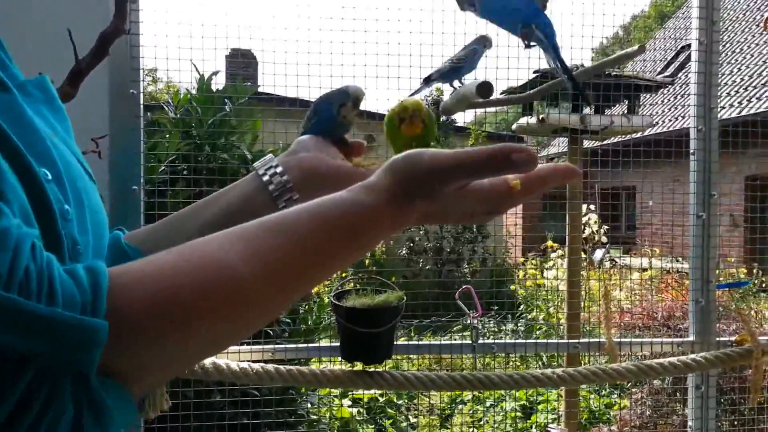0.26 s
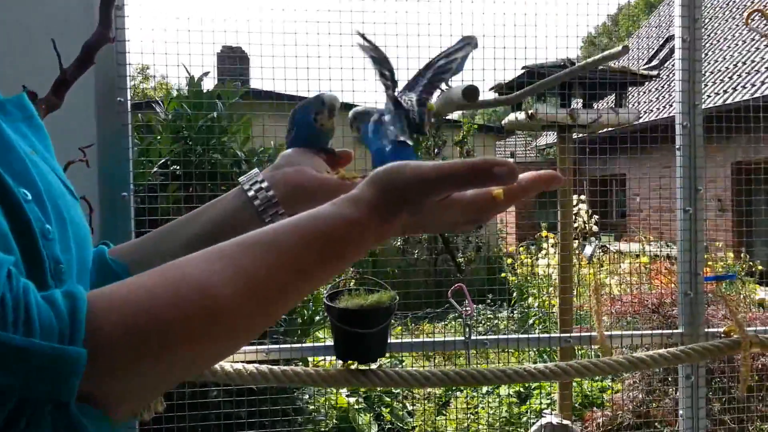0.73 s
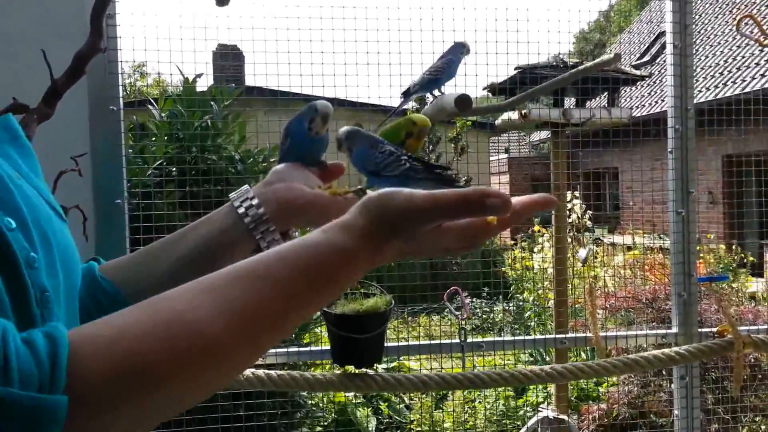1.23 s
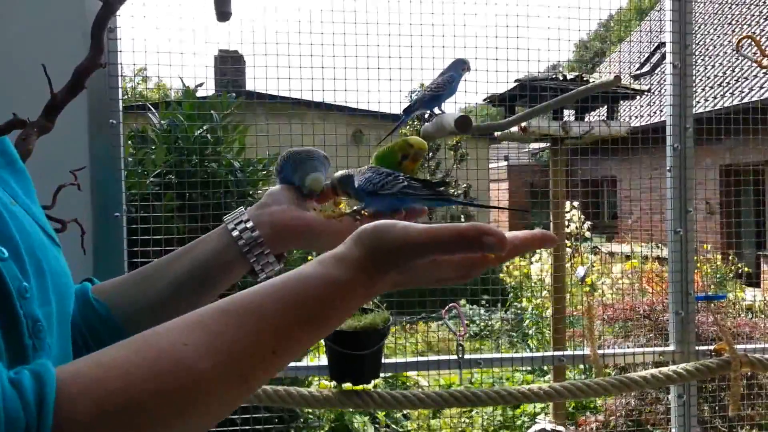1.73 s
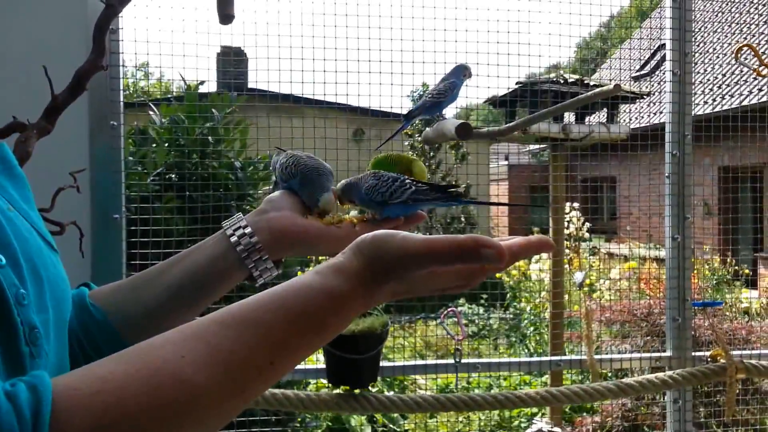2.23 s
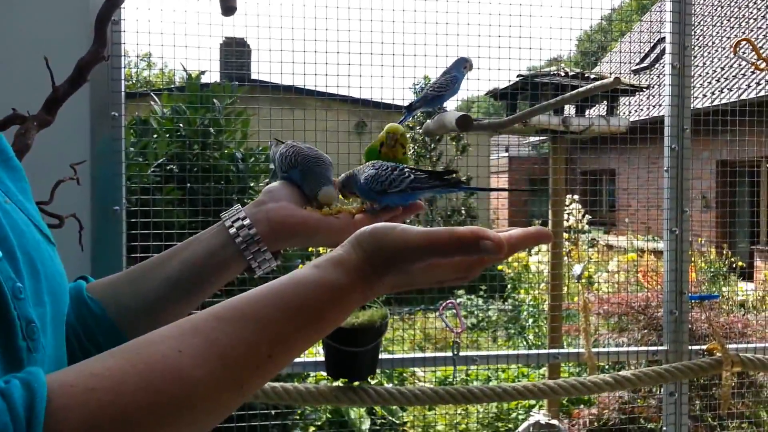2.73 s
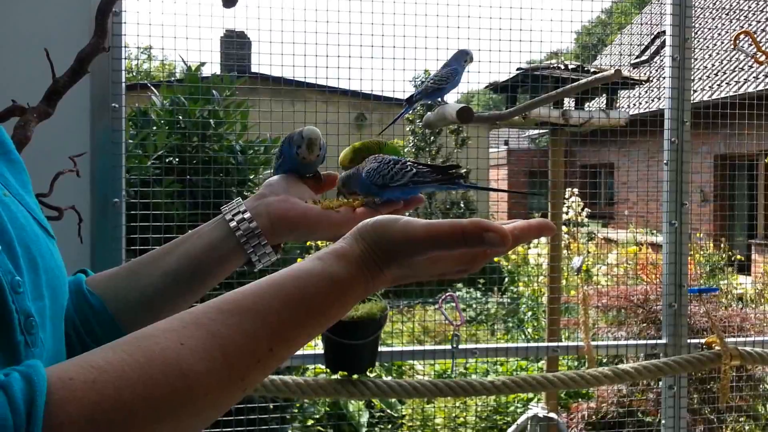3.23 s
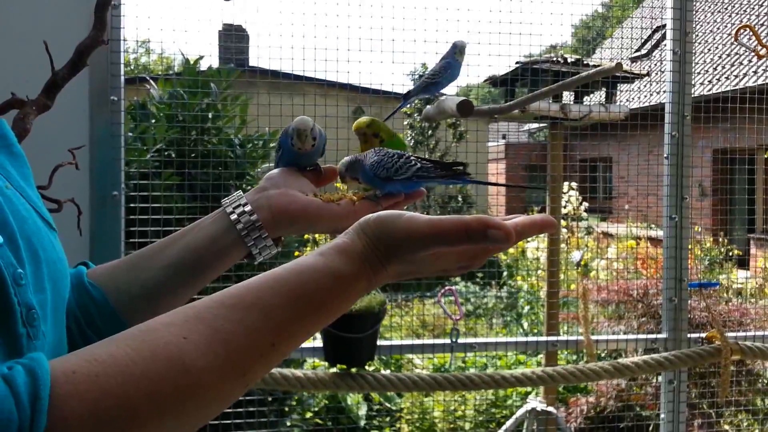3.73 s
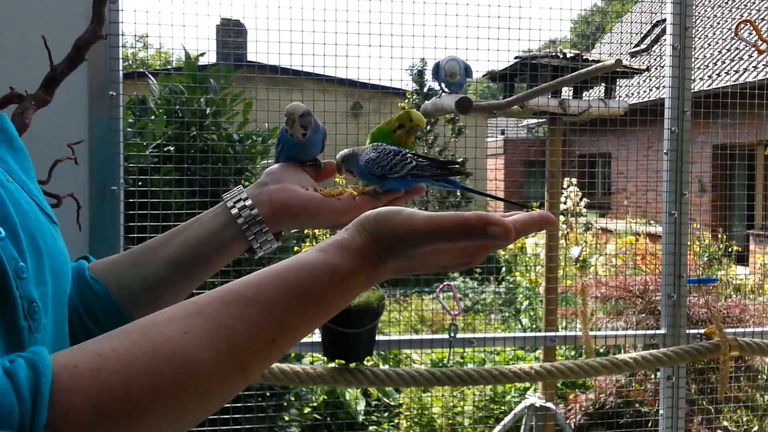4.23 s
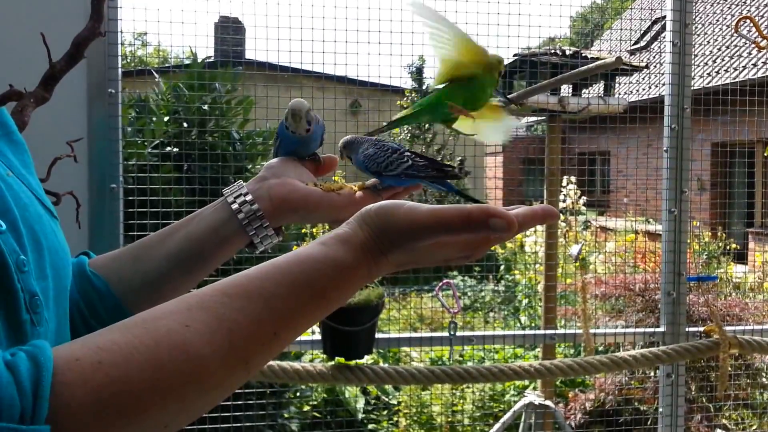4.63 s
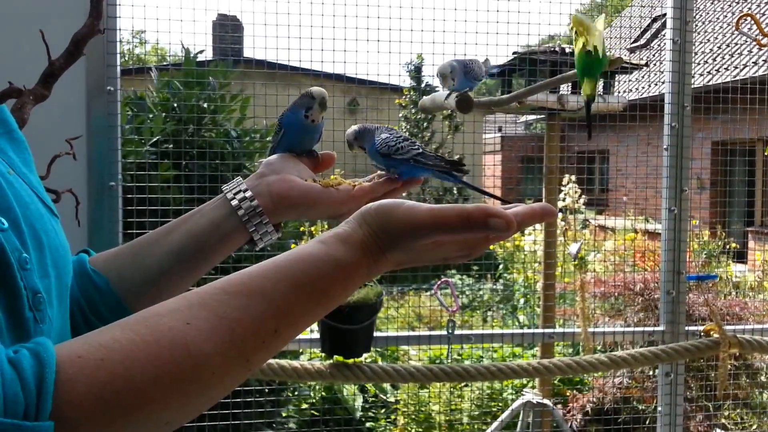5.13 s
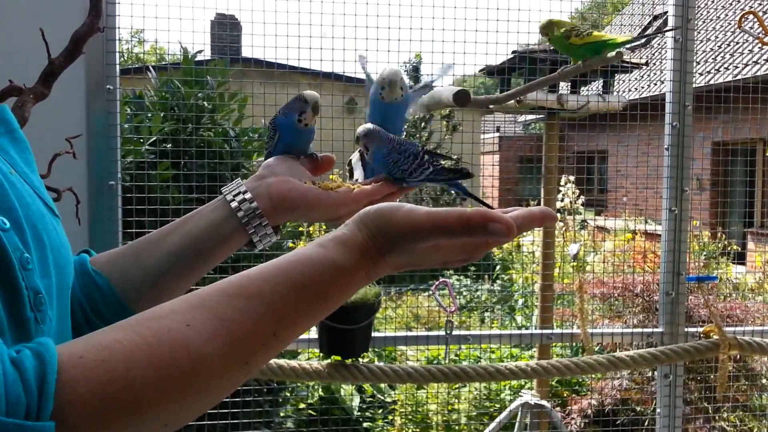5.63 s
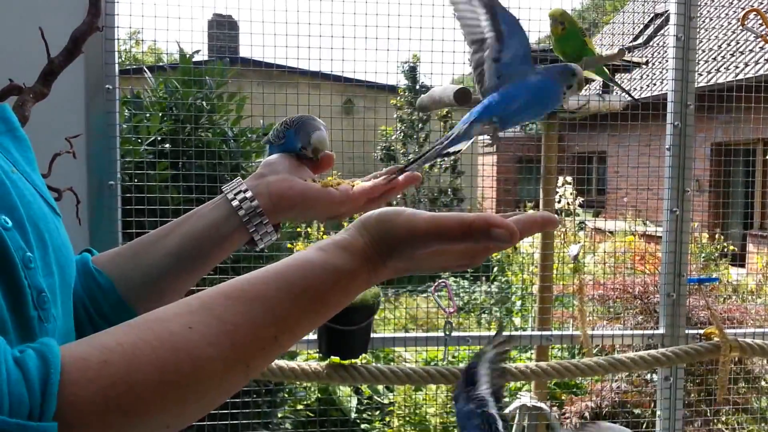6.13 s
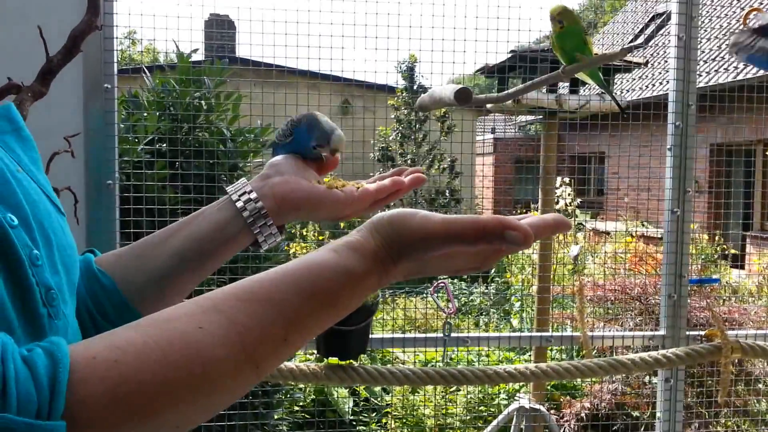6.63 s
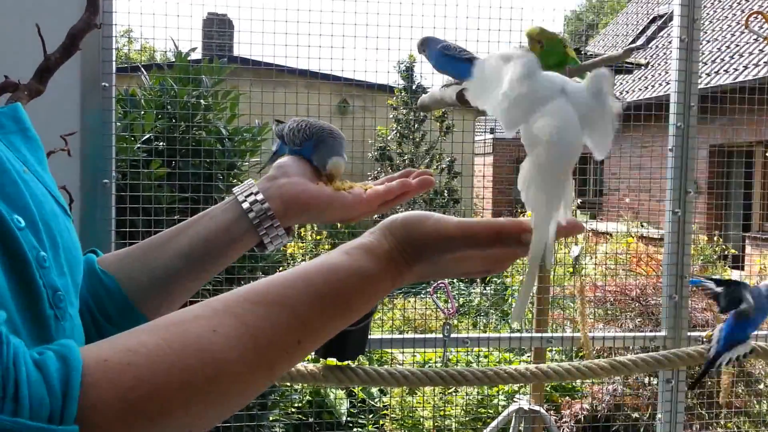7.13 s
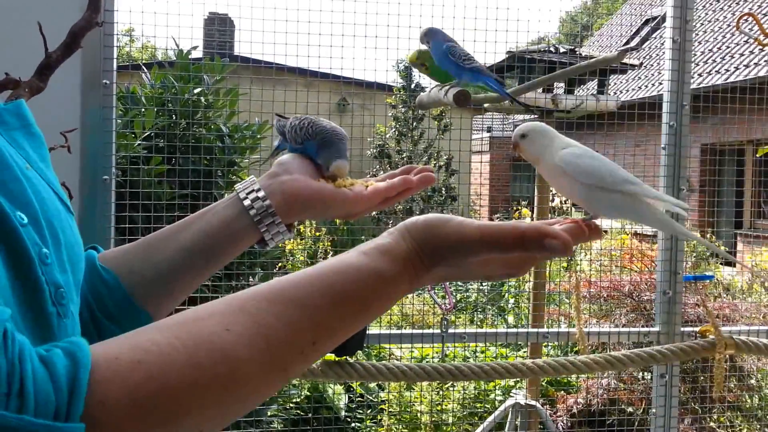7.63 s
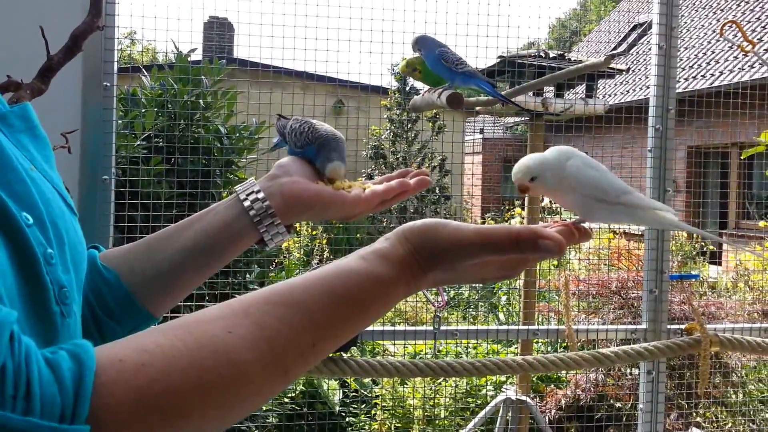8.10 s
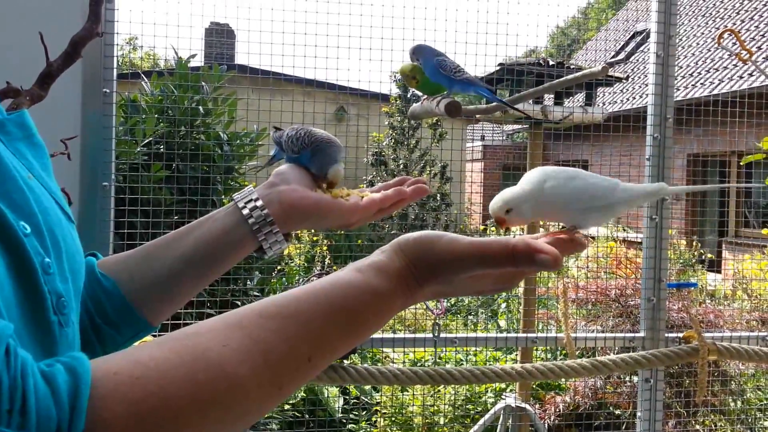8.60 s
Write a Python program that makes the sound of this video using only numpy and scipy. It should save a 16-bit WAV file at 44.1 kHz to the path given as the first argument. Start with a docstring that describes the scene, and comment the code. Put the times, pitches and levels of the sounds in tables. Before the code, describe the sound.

Close stereo pickup in a quiet outdoor aviary with a faint leafy hiss. Budgerigar wings flutter softly at first, then settle to a light rustle while other birds warble quietly farther off. A loud, buzzing rising chirp breaks out past the middle, followed by blunt puffs of wing air thumping the microphone, three quick harsh scolds, and the strongest wing flurry, which fades back to quiet garden air.

```python
"""Budgerigars flutter to and from a feeding hand in an outdoor aviary, close to a stereo microphone. Wings are
grained noise and throbbing air gated by wingbeats; their downdraught strikes the ports as short pulses. One
bird gives a loud rising chirp, a whistle with a buzz in its pitch, and three harsh scolds, harmonic stacks that
roughen. Others warble softly farther off, and beaks and claws click as ringing noise over the hiss of a quiet
garden."""
import sys
import numpy as np
from scipy import signal
from scipy.fft import rfft, irfft
from scipy.io import wavfile

SR = 44100
rng = np.random.default_rng(int(sys.argv[2]) if len(sys.argv) > 2 else 0)


def master(y):
    """Save y as 16-bit WAV."""
    cut = np.clip(np.atleast_2d(y).T, -1, 1)
    pcm = np.round(cut * 32767)  # scale
    wavfile.write(sys.argv[1], SR, pcm.astype(np.int16))


N = 390726
TIME, FREQS = np.arange(N) / SR, np.fft.rfftfreq(N, 1 / SR)

# left-right likeness of air moved by wings: f/Hz, likeness/-1 to 1
WING_LIKENESS = [(60, .2), (290, 0.65), (640, 0.82), (1400, 0.4), (3000, 0.11), (14000, .05)]
# runs of wingbeats: first beat t/s, last beat t/s, count of beats, first feather swish level/dB,
# first low push of air level/dB, first hollow whup level/dB, change per beat/dB
FLIGHTS = [(0.056, .158, 3, -52, -68, -47.5, 6.5), (0.209, 0.435, 5, -42, -55, -38.5, -.5),
           (0.501, 0.679, 4, -51, -70, -59.5, 0.87), (0.724, 0.776, 2, -51, -70, -50, 0),
           (1.179, 1.876, 12, -57, -56.5, -74.5, 0.6521), (1.939, 2.003, 2, -44, -44.5, -59, -6.5),
           (4.656, 4.743, 2, -42, -52.5, -47, 4.5), (5.621, 5.756, 3, -40, -46, -42, -3),
           (6.195, 6.251, 2, -34, -42, -34, 4.5), (6.352, 6.663, 7, -37.5, -43, -32, -.3),
           (6.378, 6.741, 8, -36, -34.5, -31.5, -0.7124), (6.789, 6.999, 5, -43.5, -47.5, -40, 1.14),
           (7.057, 7.167, 3, -45, -60.5, -42, -1.5), (7.223, 7.46, 5, -51.5, -53, -57, 1)]
STROKE_RISE_S, STROKE_FALL_S, PUSH_FALL_S = .0032, 0.0117, 0.0143


def wings():
    """Feathers rub in tiny grains, and each stroke shoves out a push of air with a hollow whup."""
    # spectrum of rubbing feathers: f/Hz, level/dB
    feather_spectrum = [(60, -59), (180, -29.5), (500, -7.5), (1500, -2), (3000, 2.5), (4600, 0.5),
                        (5800, -7), (9000, -6.5), (14500, -14.5)]
    # spectrum of stirred air: f/Hz, level/dB
    air_spectrum = [(60, -55.5), (200, -16.5), (330, -10.5), (440, 0), (680, -2.5), (1050, -2.5),
                    (1500, -8.5), (2500, -7.5), (6000, -33)]
    *_, swish_db, push_db, whup_db, _ = np.transpose(FLIGHTS)
    rustle, stirred = flurries()
    grain = unit(amp(1.8 * wander(N, 500) + .9 * wander(N, 40)))
    # trims of rustle and swish over their tables, in dB
    rub = np.hypot(amp(1.0238) * rustle, amp(2.0) * strokes(swish_db, STROKE_FALL_S))
    feathers = noise_pair(amp(read(feather_spectrum, FREQS)), WING_LIKENESS)
    swish = feathers * grain * rub * pan(-2.1)
    air = noise_pair(amp(read(air_spectrum, FREQS)), WING_LIKENESS) * stirred
    push = throb(hz=444, width=210) * strokes(push_db, PUSH_FALL_S)
    whup = throb(hz=1010, width=820) * strokes(whup_db, STROKE_FALL_S)
    return swish + air + push + whup


def strokes(levels, fall):
    """The envelope of all wingbeats: each run slows a little, and fades or grows from its first level."""
    lead_s = .002  # the middle beats of a run come this much early
    power, t = np.zeros((1, N)), np.arange(-SR // 25, SR // 12) / SR
    shape = swell(t, STROKE_RISE_S, fall)
    for (first, last, count, *_, change_db), db in zip(FLIGHTS, levels):
        for k, u in enumerate(np.linspace(0, 1, round(count))):
            s = first + (last - first) * u - lead_s * 4 * u * (1 - u)
            add(power, max(s + t[0], 0), (amp(db + k * change_db) * shape) ** 2)
    return np.sqrt(power[0])


def flurries():
    """The envelopes of feather rustle and of stirred air; the perched birds are never quite still."""
    # ruffled feathers as a bird passes, lands or shuffles:
    # peak t/s, rise/s, fall/s, feather rustle before its trim/dB, stirred air level/dB
    ruffles = [(.18, 0.12, 0.346, -48.5, -45.5), (1.018, 0.0075, 0.0214, -49.5, -65.5),
               (1.249, 0.118, 0.306, -52.5, -55), (1.59, 0.123, 0.333, -52, -74),
               (1.96, 0.108, 0.13, -52, -60), (4.3, .15, 0.26, -59, -61), (4.7, 0.091, 0.229, -43, -49.5),
               (5.289, 0.054, 0.514, -43, -67), (5.64, 0.0664, 0.261, -46, -44.5),
               (6.12, .06, 0.575, -37, -38.5), (6.56, 0.167, 0.471, -40.5, -41.5),
               (7.44, 0.057, 0.11, -50, -50.5), (7.805, 0.021, 0.051, -48.5, -68.5),
               (7.97, .06, 0.27, -54, -64.5)]
    fidget_db = -61  # constant rustle of perched birds, before the same trim
    rustle, air = np.full(N, amp(fidget_db) ** 2), np.zeros(N)
    for s, rise, fall, rustle_db, air_db in ruffles:
        shape = swell(TIME - s, rise, fall)
        rustle += (amp(rustle_db) * shape) ** 2
        air += (amp(air_db) * shape) ** 2
    return np.sqrt(rustle), np.sqrt(air)


def throb(hz, width):
    """Air oscillating around hz with even strength and wandering phase."""
    phase = np.angle(signal.hilbert(noise_pair(hump(hz, width), WING_LIKENESS)))
    return unit(irfft(rfft(np.cos(phase)) * hump(hz, 2 * width), N))


def downdraught(wind_filter_hz=190):
    """Gusts from the wings break into eddies that hit each port on its own; the wind filter thins their bass."""
    # gusts that reach the microphone: peak t/s, rise/s, fall/s, base level/dB, left minus right/dB
    gusts = [(4.68, .04, .1, -49.5, 2), (4.984, 0.0035, 0.0142, -45, -4),
             (5.07, 0.01334, 0.0794, -26, 11.5), (5.232, 0.0145, 0.0264, -26.5, 8.5),
             (5.317, 0.0047, 0.008, -22, 13), (5.395, 0.0215, 0.0445, -22, 0),
             (5.537, 0.0063, 0.0426, -36, -8), (6.005, 0.0065, 0.0316, -31.5, 10),
             (6.121, 0.0404, 0.079, -38, 18)]
    # spectrum of the rumbling draught ahead of the wind filter: f/Hz, level/dB
    draught_spectrum = [(30, -46), (90, -34.5), (170, -4), (280, 3), (450, 4), (700, -8.5), (1100, -17.5),
                        (1800, -26), (4000, -55.5)]
    # the hardest eddies: t/s, peak ahead of the wind filter/dB, f/Hz, port struck (0 left, 1 right)
    hard_eddies = [(5.064, -8, 550, 0), (5.0709, 3.5, 642, 0), (5.0789, -8.5, 577, 0),
                   (5.0849, 4.5, 796, 0), (5.1037, -15.5, 650, 0), (5.1186, -10, 617, 0),
                   (5.1704, -10.5, 720, 1), (5.2578, -0.53, 621, 1), (5.3131, -2.5, 564, 0),
                   (5.3423, -12.5, 666, 0), (5.3829, -7, 570, 1), (5.3895, -4.5, 636, 1),
                   (5.4007, 2.5, 440, 0), (5.4033, -1, 486, 1), (5.4088, -4, 669, 1),
                   (5.4498, -8.5, 454, 1)]
    per_s, over_gust_db = 110, 11  # small eddies: rate, and level over the gust
    centre_hz, spread = 563, .2  # their pitch, and its reach either way as a share

    gust_power = sum((pan(side_db) * amp(db) * swell(TIME - s, rise, fall)) ** 2
                     for s, rise, fall, db, side_db in gusts)
    out = noise_pair(amp(read(draught_spectrum, FREQS)), [(100, 0), (1000, 0.0048)]) * amp(2.0)
    out *= np.array([unit(amp(4.7 * wander(N, 70))) for _ in range(2)])  # each port rumbles unevenly
    chances = rng.random((int(per_s * N / SR), 5))
    for k, (late, side, size, pitch, turn) in enumerate(chances):
        _, pulse = eddy(centre_hz * (1 + spread * (2 * pitch - 1)), turn)
        add(out, (k + late) / per_s, one_port(side) * amp(over_gust_db) * (.5 + size) * pulse)
    out *= np.sqrt(gust_power)
    for (s, db, hz, port), turn in zip(hard_eddies, rng.random(len(hard_eddies))):
        lead, pulse = eddy(hz, turn)
        add(out, s - lead, one_port(port) * amp(db) * pulse)
    wind_filter = signal.butter(4, wind_filter_hz, "high", fs=SR, output="sos")
    return signal.sosfilt(wind_filter, out)


def eddy(hz, turn, cycles=0.527):
    """A blunt pulse of about one cycle, steeper before its peak: its lead time in s, and the sound."""
    t = np.arange(-300, 600) / SR
    width = cycles * np.where(t < 0, .8, 1.25)
    return -t[0], np.exp(-(t * hz / width) ** 2) * np.sin(2 * np.pi * (hz * t + turn))


def one_port(side):
    """Gains that send a sound to the left port (side up to .5) or to the right one alone."""
    return np.eye(2)[:, [int(side > .5)]]


def chirp(buzz_hz=300):
    """A rising whistle; a fast buzz in its pitch spreads it into close sidebands, most of all near the start."""
    # path of the whistle: t/s, level/dB, f/Hz
    path = [(4.596, -42.5, 2251), (4.608, -28, 2503), (4.627, -10.5, 3171), (4.643, -14.5, 2956),
            (4.664, -15, 3142), (4.674, -3.5, 3063), (4.686, -10.5, 3273), (4.698, -11, 3273),
            (4.708, -37, 3290)]
    # its overtones: multiple of the pitch, level/dB
    overtones = [(1, -1), (2, -19.5), (3, -57.5), (4, -50)]
    burst_at_s, burst_width_s = 4.625, 0.024
    burst_depth, steady_depth = 0.065, .03  # shares of the pitch

    s, *columns = np.transpose(path)
    t = np.arange(s[0], s[-1], 1 / SR)
    db, hz = (np.interp(t, s, c) for c in columns)
    depth = steady_depth + burst_depth * np.exp(-((t - burst_at_s) / burst_width_s) ** 2)
    buzz_rate = buzz_hz * (1 + .08 * wander(len(t), 60))
    buzz = np.sin(2 * np.pi * np.cumsum(buzz_rate) / SR)
    turns = np.cumsum(hz * (1 + depth * buzz + .008 * wander(len(t), 500))) / SR
    tone = sum(amp(part_db) * np.sin(2 * np.pi * round(k) * turns) for k, part_db in overtones)
    flutter = 1 + .35 * buzz  # the buzz sways the level too
    out = np.zeros((2, N))
    add(out, s[0], pan(-4.5) * amp(db) * unit(tone * flutter))
    return out


def scolds():
    """Short upward yelps that crack into a rasp near their loudest."""
    # yelps: start t/s, length/s, level at the top/dB, start f/Hz, top f/Hz, share of the length at the crack
    yelps = [(5.857, 0.0189, -11.5, 2177, 2695, 0.66), (5.927, 0.02515, -12.5, 2260, 2460, 0.753),
             (6.028, .029, -2.5, 2250, 2676, 0.798)]
    # resonances of the near bird's throat: f/Hz, level/dB
    throat = [(600, -22), (1300, -24.5), (2100, -3), (2650, -6.5), (4000, 1), (5200, -0.5), (6200, -8.5),
              (8000, -6.5), (9500, -13), (11500, -22), (14500, -22.5)]
    peak_at, start_db, end_db = .72, -17.5, -15.5  # top as a share of the length; levels against the top
    clear, cracked, crack_s = 0.345, 0.881, 0.00275  # roughness before and after, and time scale of the crack

    out = np.zeros((2, N))
    for s, length, db, start_hz, top_hz, crack_at in yelps:
        t = np.arange(0, length, 1 / SR)
        peak_s = length * peak_at
        effort = np.sin(np.pi / 2 * np.minimum(t / peak_s, 1)) ** 2
        release = np.maximum(t - peak_s, 0) / (length - peak_s)
        hz = start_hz + (top_hz - start_hz) * effort
        rough = clear + (cracked - clear) * (1 + np.tanh((t - crack_at * length) / crack_s)) / 2
        sound = voice(hz, rough, throat, halves=1.1, rasp=.55, jitter=.04, tilt_db=-.3)
        loudness = amp(db + start_db * (1 - effort) + end_db * release ** 2)
        add(out, s, pan(-5.5) * loudness * sound * signal.windows.tukey(len(t), .08))
    return out


def voice(hz, rough, throat, halves, rasp, jitter, tilt_db):
    """A harmonic stack; as it roughens the pitch shakes, half tones grow between the lines and noise breaks in."""
    turns = np.cumsum(hz * (1 + jitter * rough * wander(len(hz), 700))) / SR
    orders = np.arange(1, int(SR / 2.6 / hz.max()) + 1)[:, None]
    # overtones fall away above the second
    weight = amp(np.minimum(tilt_db * (orders - 1), tilt_db - abs(tilt_db) * (orders - 2)))
    lag = rng.random(orders.shape)
    whole_tones = weight * np.cos(2 * np.pi * (orders * turns + lag))
    half_tones = weight * np.cos(2 * np.pi * ((orders - .5) * turns + lag))
    # the noise pulses at half the pitch
    breath = rng.standard_normal(len(hz)) * (1 + 0.39 * np.cos(np.pi * turns))
    whole = unit(colour(whole_tones.sum(0), throat))
    half = unit(colour(half_tones.sum(0), throat))
    hiss = unit(colour(breath, throat))
    return unit((1 - .5 * rough) * whole + rough ** 2 * halves * half + rough * rasp * hiss)


def warble():
    """Soft gliding notes, some followed by a rising rasp."""
    # notes of birds farther off: t/s, length/s, level before the reverb and trim/dB, f/Hz,
    # glide as a share of the pitch, roughness/0-1, tilt per overtone/dB
    soft_notes = [(1.167, 0.0526, -57.5, 5250, 0.09, 0.41, -20.5),
                  (1.283, .035, -55, 5350, 0.048, 0.52, -23),
                  (1.818, 0.0413, -53.5, 2889, 0.0022, 0.11, -18),
                  (1.942, 0.0463, -52, 1864, -0.11, 0.2, 6), (2.012, 0.076, -51.5, 1625, -0.056, 0.13, 10),
                  (2.311, 0.0308, -50.5, 981, -0.154, 0.36, -28),
                  (2.338, 0.062, -54, 760, -0.166, 0.42, -2.5), (2.377, .066, -53.5, 1102, 0.587, 0.35, -9),
                  (2.781, 0.0335, -50.5, 838.2, -0.075, 0.26, -0.5),
                  (2.823, 0.0606, -51, 752, -0.068, 0.45, -5.5),
                  (3.325, 0.0615, -51, 1177, -0.032, 0.33, -19),
                  (4.517, 0.0235, -45.5, 4094, -0.055, 0.17, -18),
                  (4.551, 0.024, -46, 2075, .03, 0.23, -18), (4.568, 0.0195, -49, 2860, -0.14, 0.19, -19)]
    # rasps that close their phrases: t/s, length/s, level before the reverb and trim/dB, f/Hz
    closing_rasps = [(2.416, 0.087, -46.5, 624), (2.895, 0.0574, -48.5, 590), (3.363, .07, -58.5, 1076),
                     (3.485, 0.0455, -51, 605.5)]
    out = np.zeros((2, N))
    for s, *note in soft_notes:
        add(out, s, far_call(*note))
    for s, *rasp in closing_rasps:
        add(out, s, far_call(*rasp, glide=0.1245, rough=0.825, tilt_db=1))
    return out


def far_call(length, db, hz, glide, rough, tilt_db):
    """One gliding syllable of a bird farther off."""
    # throat resonances as heard from there: f/Hz, level/dB
    far_throat = [(400, -41.5), (750, 0.5), (1200, 2), (2400, 7), (3500, 2.5), (5200, -11.5), (7500, -24.5),
                  (12000, -38.5)]
    pitch = hz * (1 + glide * np.linspace(-.5, .5, round(length * SR)))
    sound = voice(pitch, rough, far_throat, halves=.49, rasp=1.0, jitter=0.1, tilt_db=tilt_db)
    return pan(-1.0) * amp(db) * sound * signal.windows.tukey(len(pitch), .5)


def clicks():
    """Dry snaps that ring briefly as filtered noise, and a few dull knocks."""
    # beaks on seed, claws and wing tips: t/s, starting level/dB, ring f/Hz,
    # width as a share of the ring, decay/s, left minus right/dB
    snaps = [(0.829, -57.5, 12000, .3, 0.0046, -1), (1.934, -46, 5000, 1.7, 0.0062, 4),
             (3.821, -43, 10260, 0.107, 0.00497, 0), (4.151, -35.5, 5100, 0.27, 0.0014, -3.5),
             (4.162, -35.5, 3910, 0.066, 0.00386, -4), (4.364, -49, 6400, .12, 0.0043, -3),
             (4.802, -43, 7000, 1.2, 0.00297, -9), (5.2534, -11, 2734, 0.35, 0.000617, 1.5),
             (6.2458, -17.5, 4000, 0.96, 0.00164, -0.5)]
    # soft knocks: t/s, level/dB, f/Hz
    knocks = [(2.215, -41, 280), (4.442, -46.5, 348)]
    out, t = np.zeros((2, N)), np.arange(4096) / SR
    f = np.fft.rfftfreq(len(t), 1 / SR) + 1
    for s, db, hz, width, decay, side_db in snaps:
        resonance = 1 + 1j * (f / hz - hz / f) / width
        ring = irfft(rfft(rng.standard_normal((2, len(t)))) / resonance)
        add(out, s, pan(side_db) * amp(db) * unit(ring) * np.exp(-t / decay))
    for s, db, hz in knocks:
        u = t / 0.0016  # time in units of the rise
        thump = u * np.exp(1 - u) * np.cos(2 * np.pi * hz * t)
        knock = np.gradient(thump) * SR / (2 * np.pi * hz)
        add(out, s, pan(0) * amp(db) * knock)
    return out


def garden():
    """The soft hiss of leaves and open air, swelling a little."""
    # spectrum of the hiss: f/Hz, level/dB
    hiss_spectrum = [(15, -59.5), (25, -38.5), (80, -22), (174, -11), (267, -7.5), (357, -4.5), (561, -3.5),
                     (659, -1.5), (1010, -3), (1420, -3.5), (1540, -5), (1960, -5), (3430, -7.5),
                     (9160, -16), (10500, -13.5), (14400, -13)]
    # its left-right likeness: f/Hz, likeness/-1 to 1
    hiss_likeness = [(60, 0), (130, 0.19), (290, .5), (640, 0.21), (1400, -0.44), (3000, 0.0035),
                     (14000, -0.13)]
    level_db = -51.5 + .4 * wander(N, 3)
    return amp(level_db) * noise_pair(amp(read(hiss_spectrum, FREQS)), hiss_likeness)


def aviary(x, near_db, tail_db, near_t60=0.08):
    """Quick scatter from hands, perches and the wall, then a thin tail from the houses around the garden."""
    # decay of the tail: f/Hz, t60/s
    tail_t60 = [(200, 0.3), (1000, .35), (3200, 0.433), (6000, 0.33), (14000, 0.1)]
    t = np.arange(SR * 3 // 4) / SR
    # sparse random echoes
    taps = rng.standard_normal((2, len(t))) * (rng.random((2, len(t))) < .12) * (t > .002)
    near = taps * amp(-60 * t / near_t60)
    # the tail swaps sides, starts later and fades at its own pace in each band
    hz, when, z = signal.stft(taps[::-1] * (t > .012), SR, nperseg=256)
    fade = amp(-60 * when / read(tail_t60, hz)[:, None])
    tail = signal.istft(z * fade, SR, nperseg=256)[1][:, :len(t)]
    response = amp(near_db) * near / np.linalg.norm(near[0]) + amp(tail_db) * tail / np.linalg.norm(tail[0])
    return x + signal.fftconvolve(x.mean(0)[None], response, axes=1)[:, :N]


def from_right(x, lag):
    """A source on the right reaches the left port lag seconds later."""
    return np.array([irfft(rfft(x[0]) * np.exp(-2j * np.pi * FREQS * lag), N), x[1]])


def amp(db):
    """Decibels to gain."""
    return 10 ** (np.asarray(db) / 20)


def unit(x):
    """Scales to rms 1."""
    return x / np.sqrt(np.mean(x ** 2) + 1e-20)


def read(points, hz):
    """Reads a table on a log-frequency axis."""
    f, value = np.transpose(points)
    return np.interp(np.log(hz + 1), np.log(f + 1), value)


def colour(x, spectrum):
    """Filters by a table of f/Hz, level/dB."""
    size = x.shape[-1]
    return irfft(rfft(x) * amp(read(spectrum, np.fft.rfftfreq(size, 1 / SR))), size)


def hump(hz, width):
    """The gain of a steep-sided resonance at every frequency."""
    return 1 / (1 + ((FREQS ** 2 - hz ** 2) / (width * FREQS + 1e-9)) ** 2)


def noise_pair(gain, likeness):
    """Stereo noise of rms 1 with a given spectrum and left-right likeness."""
    a, b = rfft(rng.standard_normal((2, N)))
    same = np.clip(read(likeness, FREQS), -1, 1)
    pair = np.array([a, same * a + np.sqrt(1 - same ** 2) * b])
    return unit(irfft(pair * gain, N))


def wander(size, hz):
    """Random drift of rms 1 along straight lines between knots, 2 * hz of them a second."""
    place = np.arange(size) * 2 * hz / SR
    knots = rng.standard_normal(int(place[-1]) + 2)
    return unit(np.interp(place, np.arange(len(knots)), knots))


def swell(t, rise, fall):
    """Grows smoothly to 1 at t = 0 and dies away."""
    return np.exp(-np.where(t < 0, (t / rise) ** 2, t / fall))


def pan(db):
    """Left and right gains of constant power, from left minus right in dB."""
    sides = amp(np.array([np.atleast_1d(db), -np.atleast_1d(db)]) / 2)
    return sides / np.sqrt((sides ** 2).mean(0))


def add(mix, s, sound):
    """Adds a sound to the mix at time s."""
    part = mix[:, round(s * SR):][:, :sound.shape[-1]]
    part += sound[..., :part.shape[-1]]


def scene():
    """All sources in the aviary."""
    whistle = aviary(from_right(chirp(), lag=.00008), near_db=-8, tail_db=-19.5)
    yelps = aviary(from_right(scolds(), lag=.000015), near_db=-4, tail_db=-18)
    far_calls = amp(-3.0) * aviary(warble(), near_db=4.5, tail_db=-5)
    snaps = aviary(clicks(), near_db=-7.5, tail_db=-34.5)
    return whistle + yelps + far_calls + snaps + wings() + downdraught() + garden()


def record(dry):
    """The loudest peaks overload the input and bend over; then a lowpass sets the band limit."""
    edge_hz = 14560
    clipped = dry / (1 + np.abs(dry) ** 8) ** (1 / 8)
    lowpass = signal.firwin(401, edge_hz, window=("kaiser", 8), fs=SR)
    return signal.oaconvolve(clipped, lowpass[None], "same")


dry = scene()
out = record(dry)
master(out)
```